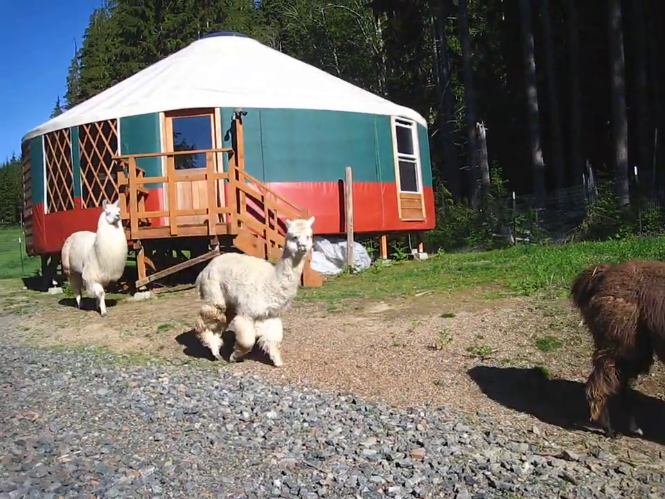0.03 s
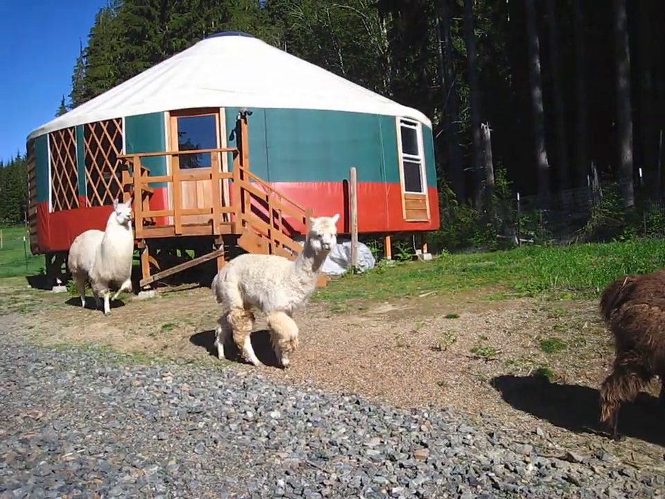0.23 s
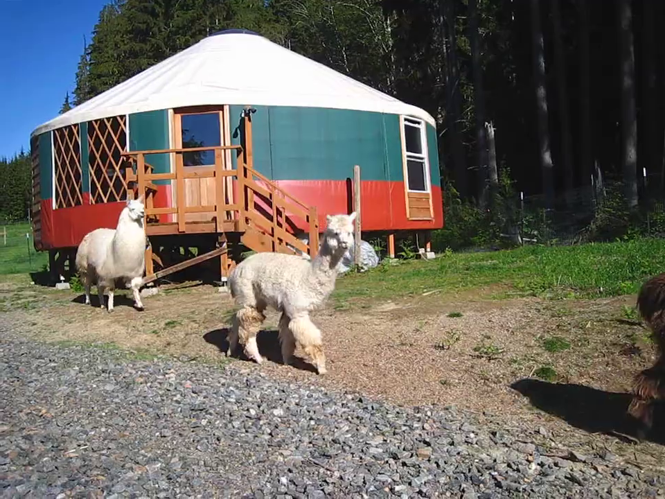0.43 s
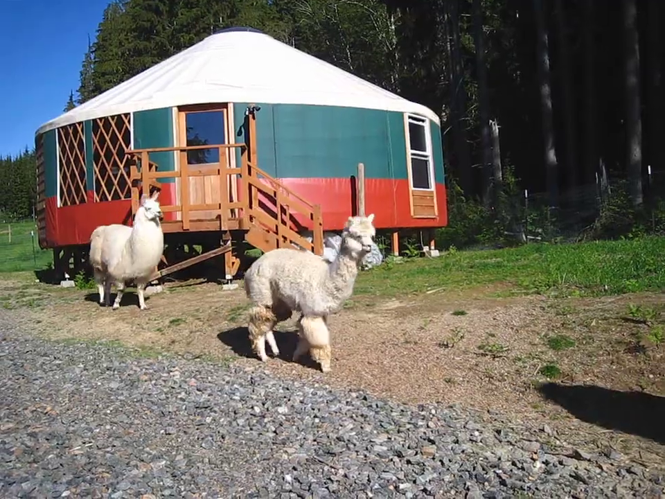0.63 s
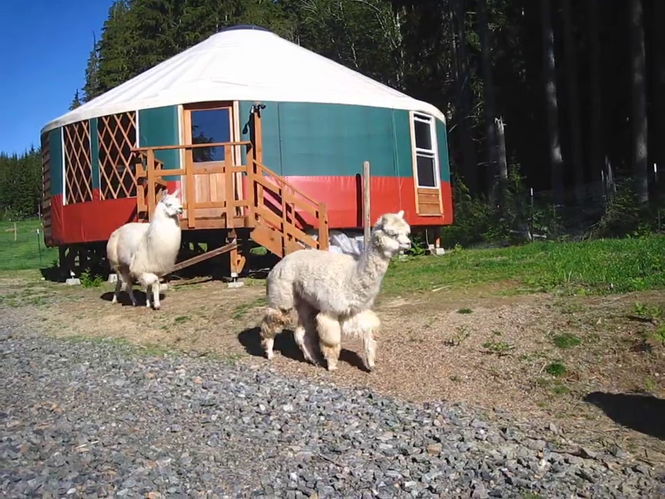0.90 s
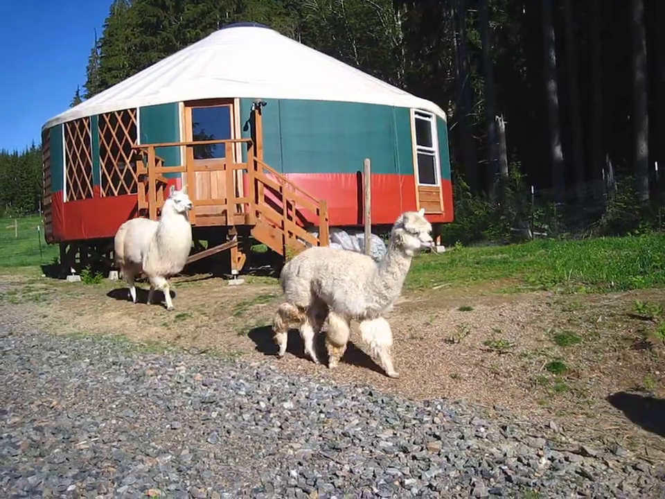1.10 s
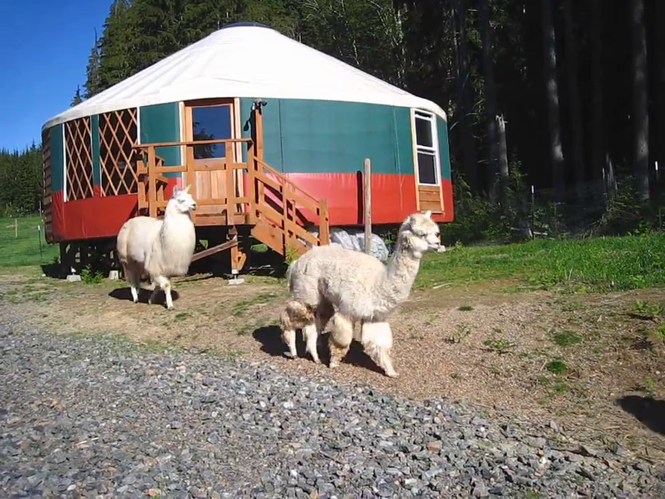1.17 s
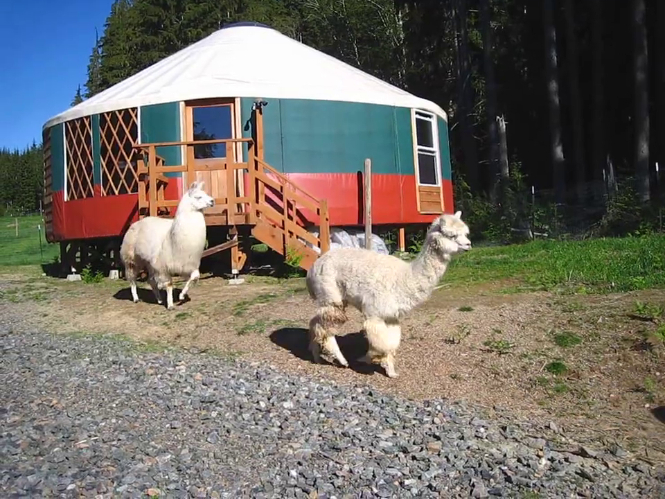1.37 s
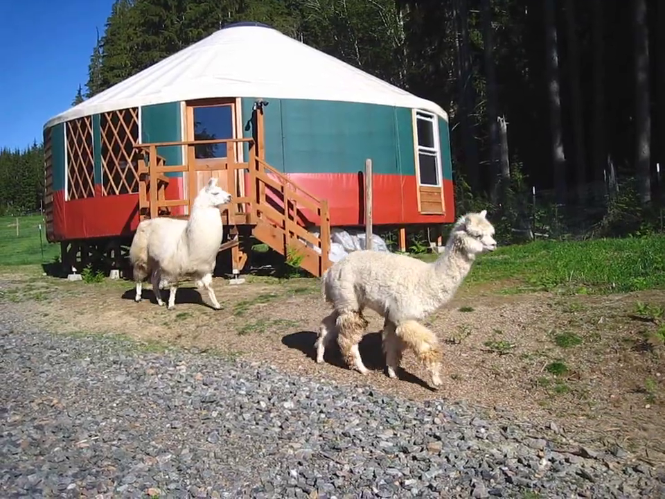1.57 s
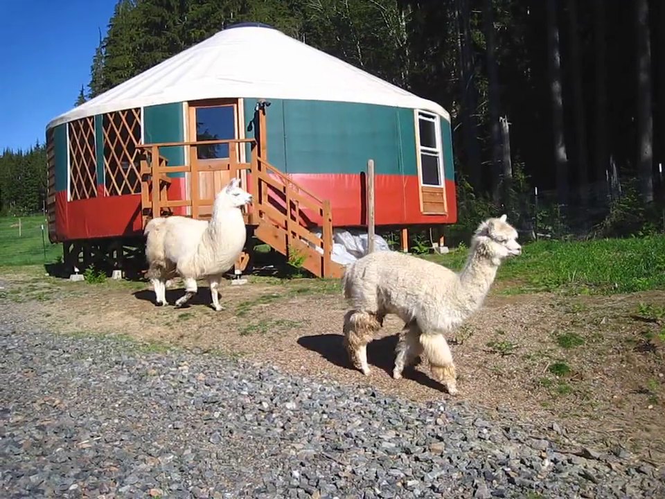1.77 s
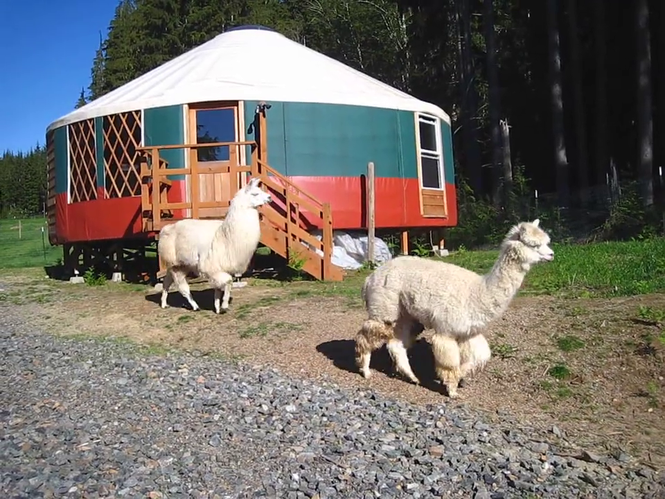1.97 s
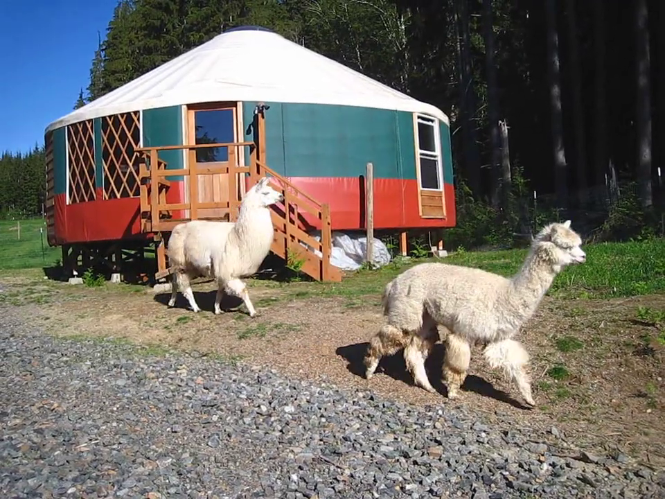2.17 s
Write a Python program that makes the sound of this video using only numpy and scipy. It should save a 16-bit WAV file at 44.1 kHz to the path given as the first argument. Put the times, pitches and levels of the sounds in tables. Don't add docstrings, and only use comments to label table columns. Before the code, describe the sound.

Loose pebbles snap together and crush underfoot in irregular bursts as animals cross a stony slope, fine grit trickling between steps over very soft wind in distant trees, picked up dry in mono by a small microphone.

```python
import sys
import numpy as np
from scipy import signal
from scipy.io import wavfile

SR = 44100
rng = np.random.default_rng(int(sys.argv[2]) if len(sys.argv) > 2 else 0)


def master(y):
    cut = np.clip(np.atleast_2d(y).T, -1, 1)
    pcm = np.round(cut * 32767)
    wavfile.write(sys.argv[1], SR, pcm.astype(np.int16))


def convert_level_to_amplitude(level_db):
    exponent = np.asarray(level_db, float) / 20
    return 10 ** exponent


N = 99225

# centre_hz, density_db_per_hz
AIR_SPECTRUM = [(25, -4.5), (70, -1), (170, -3.5), (650, 0.5), (1100, -6.5), (1600, -12.5), (5000, -17),
                (16000, -22)]
# time_s, level_db
GRIT_FLOW = [(0, -56.5), (.1, -59), (.17, -50.5), (.33, -50), (.4, -53.5), (.48, -57), (.7, -52.5),
             (.85, -49.5), (1.0, -52), (1.12, -56.5), (1.25, -54), (1.4, -46.5), (1.55, -49.5),
             (1.64, -55.5), (1.75, -47.5), (1.92, -49), (2.1, -47.5), (2.2, -54.5)]
# centre_hz, density_db_per_hz
GRIT_SPECTRUM = [(500, -38), (800, -3), (1500, -4), (4700, -7), (11000, -13.5), (15500, -32)]
# most_weight_s, level_db, dying_s, centre_hz
FOOT_CRUNCHES = [(0.147, -49.5, 0.054, 3480), (.19, -45, 0.0099, 6100), (0.209, -36.5, 0.013, 3880),
                 (.238, -37, 0.019, 2900), (.271, -34, 0.0094, 3230), (.309, -43, .01, 3100),
                 (.548, -48.5, 0.019, 5500), (0.607, -50, 0.012, 4480), (0.671, -49, 0.014, 4970),
                 (0.76, -34, 0.0047, 4400), (0.779, -32.5, 0.022, 4040), (.835, -44.5, 0.026, 4500),
                 (.888, -37, .012, 3900), (0.951, -45.5, 0.0088, 3970), (1.039, -45, 0.01, 4900),
                 (1.21, -41.5, 0.012, 4260), (1.29, -49, 0.013, 8000), (1.316, -39, 0.026, 4870),
                 (1.393, -40, 0.021, 3970), (1.482, -41, 0.033, 5170), (1.506, -38, 0.023, 3640),
                 (1.74, -44.5, 0.032, 4100), (1.804, -44.5, 0.047, 4470), (2.069, -44.5, 0.032, 12600),
                 (1.86, -40, 0.019, 6000), (1.951, -43, 0.039, 5900), (2.003, -37, 0.012, 2820),
                 (2.038, -36, 0.0083, 4020), (2.06, -36.5, 0.017, 2610), (2.242, -46, 0.021, 7500)]
# peak_s, peak_db, ring_hz
PEBBLE_KNOCKS = [(0.1675, -30, 4350), (0.1944, -22.5, 5750), (0.2071, -12.5, 3950), (0.2091, -26, 4610),
                 (0.237, -30, 4390), (0.2412, -28.0, 2920), (0.2606, -10, 3170), (0.2615, -10, 3870),
                 (0.2629, -1.0, 5040), (0.2641, -16, 3740), (0.2659, -14.5, 5090), (0.2683, -22, 2750),
                 (0.2709, -25, 5210), (0.2719, -23, 4160), (0.2732, -23, 2830), (0.275, -22.5, 2600),
                 (0.3054, -23, 4280), (0.3078, -18.5, 3200), (0.309, -27, 4300), (0.3793, -32, 4540),
                 (0.4405, -32.5, 3780), (0.4418, -39, 4360), (0.5335, -29, 4600), (0.6131, -30, 5900),
                 (0.6671, -17.5, 5640), (0.7299, -30.5, 2410), (0.7515, -27, 4280), (0.7607, -26, 2650),
                 (0.7631, -22, 4490), (0.7643, -19.5, 5580), (0.7709, -16, 3850), (0.775, -22.5, 4730),
                 (0.7763, -22, 5310), (0.7775, -14.5, 5200), (0.7802, -28, 4300), (0.7816, -26, 5840),
                 (0.7849, -18.0, 5160), (0.7897, -26, 3490), (0.7912, -18, 4900), (0.7955, -20.5, 4800),
                 (0.8201, -24, 5370), (0.8306, -15.5, 4640), (0.8677, -25, 5430), (0.8855, -17.5, 4550),
                 (0.8872, -21.5, 4640), (0.8918, -21.5, 4600), (0.9223, -24.5, 2630), (0.925, -23, 5190),
                 (0.9455, -19, 4530), (0.955, -25.5, 4300), (0.957, -39, 4980), (1.0406, -29.5, 4730),
                 (1.0486, -28, 5700), (1.0745, -33.0, 4630), (1.1646, -34, 5910), (1.2068, -31.5, 2590),
                 (1.2083, -29, 4630), (1.2112, -29.0, 4560), (1.2269, -29.5, 2500), (1.235, -25, 5800),
                (1.2702, -33.0, 5940), (1.288, -30.0, 4840), (1.3125, -23.0, 3610), (1.3133, -27.5, 4720),
                (1.3154, -23, 4970), (1.3178, -24.0, 5400), (1.3218, -28, 4580), (1.3235, -30, 3920),
                (1.3262, -26, 4170), (1.3912, -27, 2930), (1.4455, -23.5, 4160), (1.4728, -25, 5500),
                (1.4854, -29, 4980), (1.4868, -20, 6000), (1.4996, -23.5, 1980), (1.51, -25, 3400),
                (1.5108, -22, 3770), (1.5309, -26, 5640), (1.6581, -35, 3220), (1.659, -30, 3220),
                (1.7303, -28, 4190), (1.7413, -29, 5370), (1.7457, -26, 5380), (1.7834, -12.5, 4850),
                (1.7846, -34, 4150), (1.809, -25.0, 4310), (1.8185, -25, 3530), (1.8333, -12.5, 6550),
                (1.838, -15.5, 4790), (1.859, -23, 3480), (1.8624, -32, 3830), (1.8774, -27, 4750),
                (1.8783, -26, 5060), (1.889, -20.5, 5150), (1.9384, -30.5, 5030), (1.9447, -28.5, 5810),
                (1.9507, -16.5, 4900), (1.9665, -36, 5490), (1.9859, -20, 4900), (1.995, -18, 6200),
                (1.9986, -30, 1980), (2.0024, -10, 7200), (2.0345, -29.0, 3470), (2.038, -23, 3420),
                (2.0408, -27, 3440), (2.0549, -29, 4400), (2.0666, -21, 3530), (2.1646, -32, 4500),
                (2.1696, -34.5, 4500), (2.1886, -31.5, 4550), (2.2334, -26, 5500), (2.2385, -22.5, 4970)]
# peak_s, peak_db, ring_hz
SHIFTING_STONES = [(.238, -32, 880), (.2625, -26.5, 1070), (0.263, -36, 310), (.2625, -40.5, 115),
                   (1.3, -28, 13000), (.7514, -31, 14000), (.3075, -27, 1500), (.5244, -33.5, 980),
                   (1.5, -29, 1150), (1.9945, -29, 780), (1.9945, -23.5, 1500), (2.0019, -12.5, 4050),
                   (2.056, -29, 970), (2.057, -33, 2400), (2.0655, -28.5, 1000)]
# peak_s, peak_db, ring_hz
STONE_CHIPS = [(0.159, -34, 9830), (0.207, -24.5, 11000), (0.263, -16, 10640), (0.3079, -25, 9220),
               (0.3537, -30, 8800), (0.5529, -32.5, 8710), (0.6672, -28, 8980), (0.7515, -27.0, 10620),
               (0.7551, -26.5, 9390), (0.7603, -36, 9680), (0.8187, -32.5, 8760), (0.8883, -39, 8740),
               (1.0486, -22.5, 8980), (1.0651, -34, 13110), (1.1483, -27.5, 10850), (1.1616, -36.0, 11820),
               (1.163, -37.0, 11180), (1.1646, -21.5, 10100), (1.1663, -22, 10590), (1.2719, -30, 12330),
               (1.2892, -19.5, 11000), (1.3127, -28, 10270), (1.345, -31, 9900), (1.4011, -27, 8720),
               (1.4733, -22.5, 8400), (1.5113, -26.5, 11630), (1.5314, -32, 9500), (1.6279, -35.0, 10570),
               (1.7836, -34, 8440), (1.8329, -26, 8150), (1.8608, -34, 8820), (1.8625, -25, 8000),
               (1.869, -19.5, 11080), (1.9386, -20.0, 11360), (1.9449, -32.0, 8780), (1.9481, -33, 12550),
               (1.9511, -19, 8240), (1.9531, -35, 9730), (1.9856, -23, 8360), (1.9939, -28, 8350),
               (2.0015, -11, 10100), (2.0125, -22, 8360), (2.1487, -32, 13260), (2.1503, -34, 12500),
               (2.1747, -31, 11190), (2.2331, -23.5, 9750)]
# peak_s, peak_db, ring_hz
FLAT_STONES = [
    (0.2596, -21, 3910),
    (0.2617, -22, 2560),
    (.2632, -23.5, 1650),
    (0.2623, -19, 2430),
    (0.6153, -34.5, 2380),
    (2.0025, -33.5, 1460),
    (2.003, -33, 1940),
]
# centre_hz, width_hz, extra_db
MIC_RESONANCES = [(4970, 2000, -6), (11500, 2000, -12.5)]

AIR_DB, GUST_DB = -53.5, 0.5
GRIT_GRAINS_PER_S, GRIT_SIZE_DB = 6000, 2.5
CRUNCH_GRAINS_PER_S, CRUNCH_SIZE_DB = 4500, 2
GRAIN_CYCLES, CONTACT_CYCLES = 8.3, 2.6
RISE_SHARE = 0.43
SPREAD_BELOW_OCTAVES, SPREAD_ABOVE_OCTAVES = 1, 0.87
KNOCK_CYCLES, CHIP_CYCLES, RINGER_CYCLES, KNOCK_RISE_CYCLES = 5.6, 10.6, 37, 0.35
OVERTONE_DB, SNAP_DB, SNAP_DB_PER_OCTAVE, CHIP_SNAP_DB = -18.5, -13.5, 11, -18.5
SCATTER_DB, SCATTER_S = -23.5, 0.0019
CUTOFF_HZ = 15700


def rms_one(x):
    return x / np.sqrt(np.mean(x ** 2) + 1e-20)


def at_hz(points, hz):
    point_hz, db = np.transpose(points)
    return np.interp(np.log(hz), np.log(point_hz), db)


def drift(rate_hz):
    pole = np.exp(-80 * np.pi * rate_hz / SR)
    noise = rng.standard_normal(N // 40 + 2002)
    slow = signal.lfilter([1], [1, -2 * pole, pole * pole], noise)[2000:]
    return np.interp(np.arange(N) / 40, np.arange(len(slow)), rms_one(slow))


def ring(clicks, hz, t60_s):
    radius = convert_level_to_amplitude(-60 / (t60_s * SR))
    angle = 2 * np.pi * hz / SR
    return signal.lfilter([1, 0, -1], [1, -2 * radius * np.cos(angle), radius ** 2], clicks + 1e-18)


def grains(per_s, size_db, gain_at, count=22):
    sizes = convert_level_to_amplitude(size_db * np.minimum(rng.exponential(1, N), 3.5)) * rng.choice([-1, 1], N)
    clumping = convert_level_to_amplitude(2.76 * drift(92))
    contacts = sizes * (rng.random(N) < per_s / SR) * clumping
    dealt = rng.integers(0, count, N)

    def stone(clicks, hz):
        return ring(ring(clicks, hz, GRAIN_CYCLES / hz), hz, CONTACT_CYCLES / hz)

    out = 0
    for k, hz in enumerate(np.geomspace(700, 16000, count)):
        clicks = contacts * (dealt == k)
        plain_rms = np.sqrt(np.mean(stone(clicks, hz) ** 2))
        out = out + stone(clicks * gain_at(hz), hz) / plain_rms
    return out / np.sqrt(count)


def air():
    out = 0
    edges_hz = 22 * 2 ** np.arange(0, 9.6, 0.5)
    white = rng.standard_normal((2, N + 8000))
    gust = drift(0.9)
    for k, (low, high) in enumerate(zip(edges_hz, edges_hz[1:])):
        band_filter = signal.butter(2, [low, high], "band", fs=SR, output="sos")
        band = signal.sosfilt(band_filter, white[k % 2])[-N:]
        flicker_db = GUST_DB * (gust + 0.39 * drift(4.6))
        out = out + band * convert_level_to_amplitude(at_hz(AIR_SPECTRUM, np.sqrt(low * high)) + flicker_db)
    return convert_level_to_amplitude(AIR_DB) * rms_one(out)


def trickle():
    s, db = np.transpose(GRIT_FLOW)
    flow = convert_level_to_amplitude(np.interp(np.arange(N) / SR, s, db))

    def gain_at(hz):
        return convert_level_to_amplitude(at_hz(GRIT_SPECTRUM, hz)) * np.sqrt(hz)

    return flow * rms_one(grains(GRIT_GRAINS_PER_S, GRIT_SIZE_DB, gain_at))


def crunches():
    s, db, dying_s, centre_hz = np.transpose(FOOT_CRUNCHES)[:, :, None]
    late = (np.arange(0, N, 32) / SR - s) / dying_s
    weight = convert_level_to_amplitude(db + 3.7) * np.exp(np.where(late > 0, -late, late / RISE_SHARE))

    def gain_at(hz):
        spread = np.where(hz > centre_hz, SPREAD_ABOVE_OCTAVES, SPREAD_BELOW_OCTAVES)
        colour = np.exp(-(np.log2(hz / centre_hz) / spread) ** 2 / 2)
        total = np.sqrt(np.sum((weight * colour) ** 2, axis=0))
        return np.repeat(total, 32)[:N]

    return grains(CRUNCH_GRAINS_PER_S, CRUNCH_SIZE_DB, gain_at)


def knock(hz, ring_cycles, overtone_luck, overtone_share, noise):
    t = np.arange(len(noise)) / SR
    cycles = t * hz
    if hz < 500:
        ring_cycles = ring_cycles * 0.4
    swell = (1 - np.exp(-cycles / KNOCK_RISE_CYCLES)) * convert_level_to_amplitude(-60 * cycles / ring_cycles)
    ratio = min(1.405 + 1.17 * overtone_luck, 15000 / hz)
    overtone = convert_level_to_amplitude(OVERTONE_DB - 14 * overtone_share) * np.sin(2 * np.pi * ratio * cycles)
    sound = swell / swell.max() * (np.sin(2 * np.pi * cycles) + overtone)
    snap_db = min(CHIP_SNAP_DB, SNAP_DB + SNAP_DB_PER_OCTAVE * np.log2(hz / 5000))
    sound[:4] += convert_level_to_amplitude(snap_db) * np.array([1, 1, -1, -1])
    sound += convert_level_to_amplitude(SCATTER_DB) * rms_one(ring(noise, hz, 6 / hz)) * np.exp(-t / SCATTER_S)
    high_pass = signal.butter(1, hz / 3, "high", fs=SR)
    return signal.lfilter(*high_pass, sound), np.argmax(swell)


def knocks():
    pebbles = PEBBLE_KNOCKS + SHIFTING_STONES
    out = np.zeros(N + SR)
    groups = [(pebbles, KNOCK_CYCLES), (STONE_CHIPS, CHIP_CYCLES), (FLAT_STONES, RINGER_CYCLES)]
    for stones, ring_cycles in groups:
        for s, db, hz in stones:
            luck, share, side = rng.random(3)
            sound, peak = knock(hz, ring_cycles, luck, share, rng.standard_normal(900))
            start = int(s * SR) - peak
            out[start:start + len(sound)] += np.sign(side - 0.5) * convert_level_to_amplitude(db) * sound
    return convert_level_to_amplitude(-2) * out[:N]


def scene():
    return (air() + trickle() + crunches() + knocks())[None]


def low_pass(x):
    return signal.sosfilt(signal.butter(12, 16970, fs=SR, output="sos"), x)


def record(dry):
    x = dry.copy()
    for hz, width_hz, db in MIC_RESONANCES:
        x = x + convert_level_to_amplitude(db) * signal.lfilter(*signal.iirpeak(hz, hz / width_hz, fs=SR), dry)
    top_cut = signal.cheby2(12, 40, CUTOFF_HZ * 1.07, fs=SR, output="sos")
    return low_pass(signal.sosfilt(top_cut, x))


dry = scene()
out = record(dry)
master(out)
```